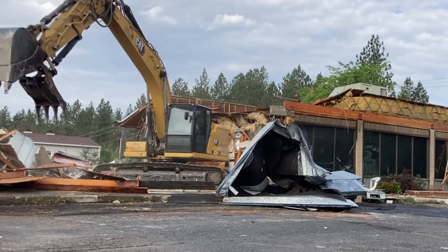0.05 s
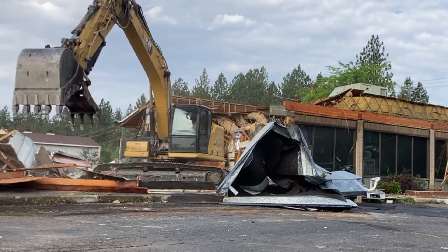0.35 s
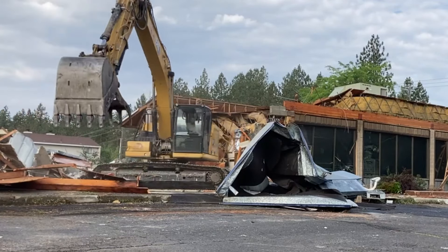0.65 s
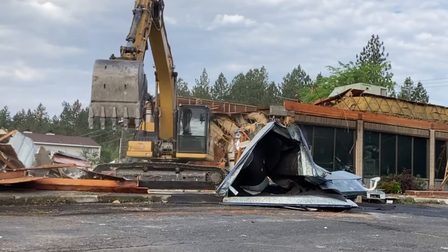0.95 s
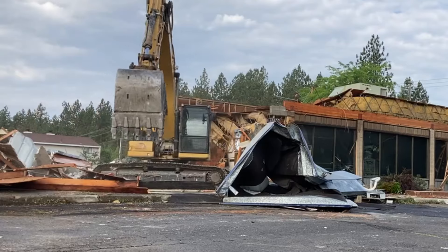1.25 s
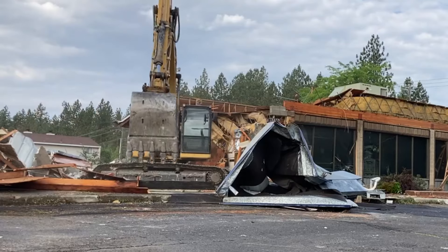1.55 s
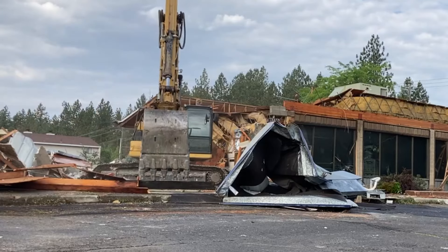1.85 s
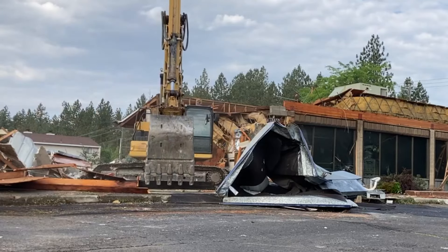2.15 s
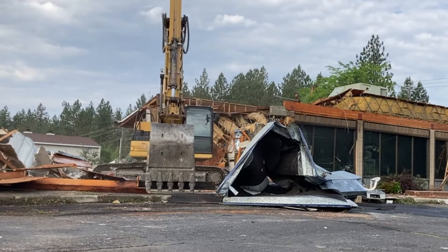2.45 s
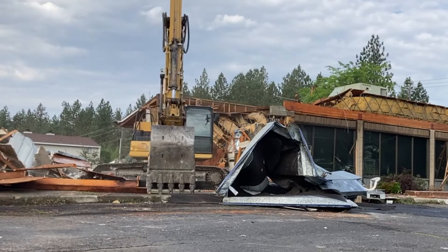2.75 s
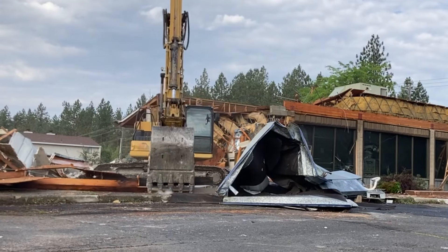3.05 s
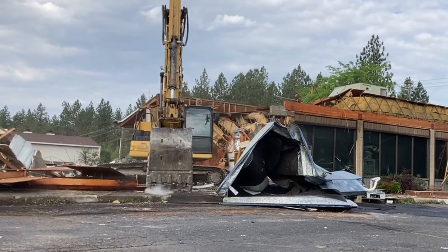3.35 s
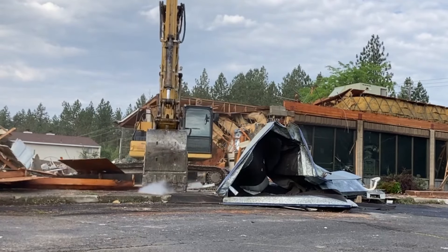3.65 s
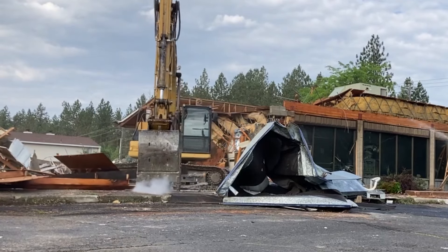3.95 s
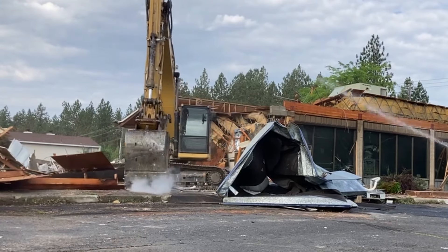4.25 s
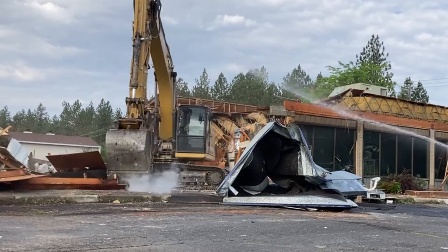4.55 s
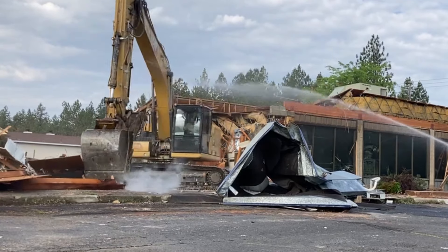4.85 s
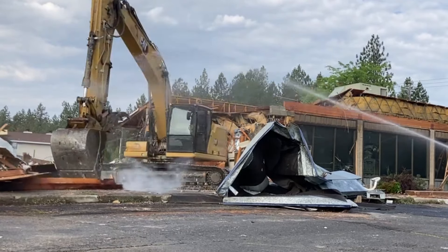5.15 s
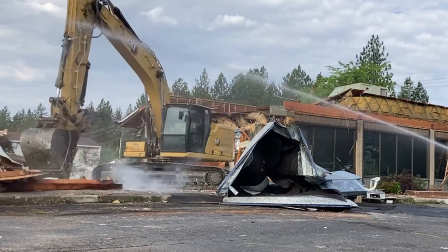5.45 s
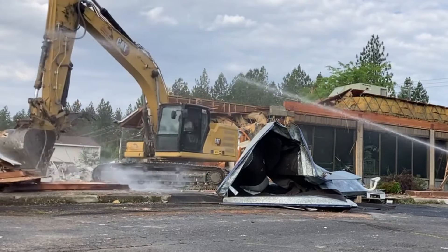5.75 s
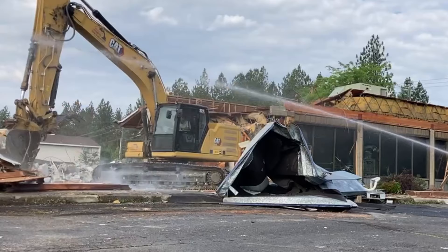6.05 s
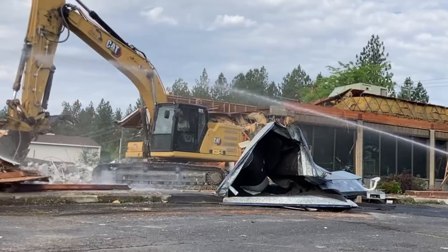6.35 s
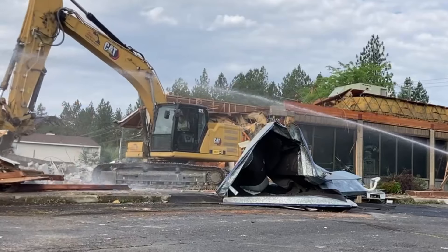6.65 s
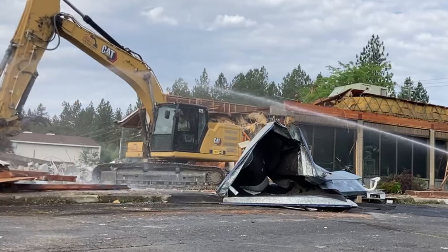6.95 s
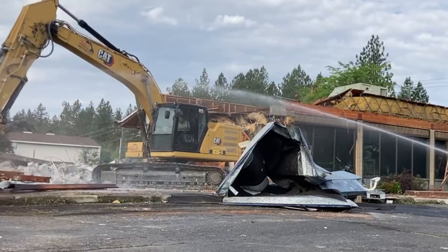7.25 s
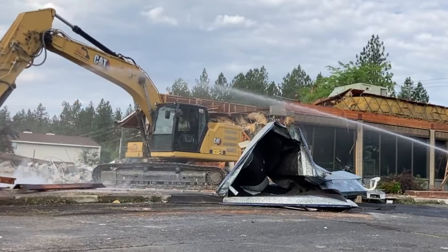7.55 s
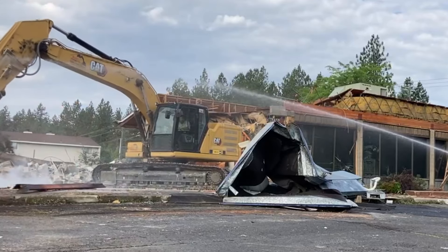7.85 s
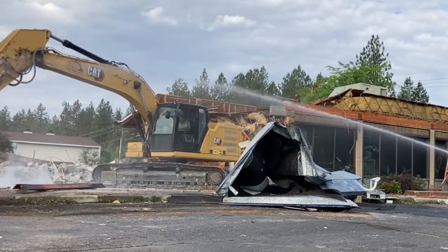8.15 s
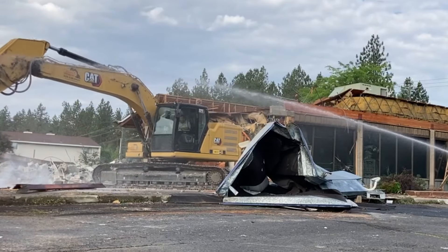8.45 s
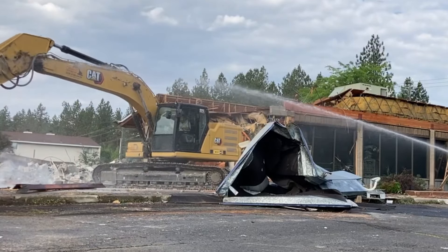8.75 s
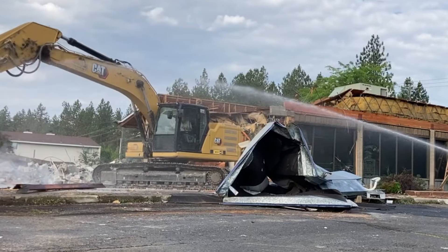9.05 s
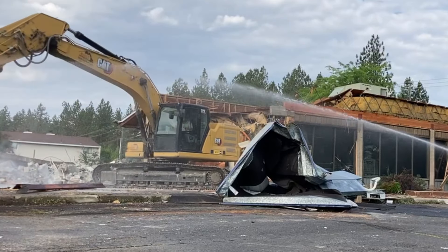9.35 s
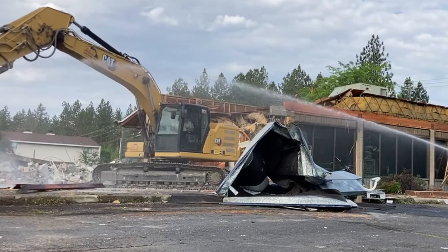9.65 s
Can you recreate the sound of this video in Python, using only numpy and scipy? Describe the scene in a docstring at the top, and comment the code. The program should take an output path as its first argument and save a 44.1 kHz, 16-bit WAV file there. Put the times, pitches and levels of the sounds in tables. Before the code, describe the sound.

Heard from across an open paved lot, an excavator runs with a low diesel hum, a hydraulic whistle and faint linkage rattles. Its steel bucket touches down and scrapes over the pavement, pushing debris toward the left. Hollow metal panels groan and slam, boards crack and steel clanks. The crunching is heaviest in the second half, then dies down over the continuing engine.

```python
"""Excavator shoving wreckage

An excavator swings its bucket over a paved lot, sets it down and shoves a heap to the left. Periodic
combustion drives the diesel's hum, hydraulic motors drone, oil hisses in a valve and the linkage clanks.
Then stick-slip friction grinds steel on asphalt and makes sheet metal squeak, panels rumble in their
modes and timber snaps by brittle fracture. A two-port microphone hears it from across the lot."""
import sys
import numpy as np
from scipy import signal
from scipy.fft import irfft, next_fast_len
from scipy.io import wavfile
from scipy.ndimage import uniform_filter1d, map_coordinates

SR = 44100
rng = np.random.default_rng(int(sys.argv[2]) if len(sys.argv) > 2 else 0)


def log_audio(samples):
    """Write samples as a 16-bit WAV file to the path given in sys.argv[1]."""
    # one column per channel
    frames = np.atleast_2d(samples).T
    # limit to full scale, then quantise
    limited = np.clip(frames, -1, 1)
    pcm = np.round(limited * 32767).astype(np.int16)
    wavfile.write(sys.argv[1], SR, pcm)


N = 437031
T = np.arange(N) / SR
TOUCHDOWN_S = 2.62

# How hard the bucket shoves: time_s, heap_load_db, teeth_pressure_db
SHOVE_FORCE = [(2.68, -26, -29.5), (2.84, -22, -20.5), (2.95, -15, -20.5), (3.33, -15.5, -20.5),
               (3.44, -23, -23), (3.7, -18, -20.5), (3.97, -26, -21.5), (4.35, -23, -22), (5.5, -21.5, -23),
               (5.8, -23.5, -28), (5.96, -13, -19), (6.11, -14, -22), (6.38, -24, -31), (6.55, -20.5, -26),
               (6.78, -9.5, -17), (7.0, -18, -23.5), (7.17, -13, -19.5), (7.38, -14.5, -20),
               (7.7, -17.5, -22), (7.98, -14.5, -23), (8.38, -13, -20), (8.6, -20.5, -26),
               (9.49, -27.5, -30.5), (9.76, -25, -23), (9.9, -28, -31.5)]
# Spectra of the heap's thuds, teeth on asphalt, splintering wood and grit: frequency_hz, density_db
HEAP_SPECTRUM = [(20, -34), (45, -40), (70, -4), (150, -5), (210, 1.5), (300, -2.5), (420, -4.5),
                 (560, -13.5), (1000, -63.5)]
TEETH_SPECTRUM = [(250, -28.5), (450, -2), (620, -5.5), (800, -8.5), (1050, -5), (1550, -10.5), (2000, -18),
                  (3500, -40.5)]
WOOD_SPECTRUM = [(1000, -18), (2300, 3.5), (3100, -5), (3900, -8), (5000, -7.5), (6000, -17.5),
                 (8500, -32.5)]
GRIT_SPECTRUM = [(3500, -92), (6000, 7.5), (7200, 5), (8400, 9), (10000, -0.5), (11500, 6), (13000, -5),
                 (16000, -30)]
# Hollow modes of the bucket and the panels it pushes, before bending: pitch_hz, level_db, t60_s
PANEL_MODES = [(127.4, -2, 0.51), (206.5, 12.5, 0.14), (365.7, 2, 0.23)]
# Strongest panel mode as the panels bend: time_s, pitch_hz
PANEL_BEND = [(3.3, 208), (6.2, 206.8), (6.75, 218.2), (7.4, 218.8), (7.75, 203.7), (7.95, 190.8),
              (8.15, 201.5), (8.45, 214.3)]
# Panels buckling and slamming down: start_s, level_db, t60_s
PANEL_SLAMS = [(2.89, -2.5, 0.19), (2.931, 3, 0.095), (3.075, -7, 0.28), (3.32, -5.5, 0.16),
               (4.085, -11.5, 0.15), (5.36, -7.5, 0.13), (5.559, 0.5, 0.066), (6.135, -3, 0.13),
               (6.72, -11, 0.17), (7.385, -11, 0.097), (7.565, -5, 0.25), (7.755, -5.5, .18),
               (7.865, -7, 0.13), (8.139, -1.5, 0.17), (8.191, -2, 0.12), (8.425, -7.5, 0.24)]
# Pieces crushed under the bucket: start_s, length_s, wood_db, grit_db
CRUSHED_PIECES = [(2.821, 0.1, -29, -29), (2.968, 0.34, -40, -36), (3.476, 0.43, -32, -31),
                  (4.824, 0.44, -32, -36.5), (5.313, 0.089, -30.5, -31.5), (5.466, 0.13, -25.5, -31.5),
                  (6.54, 0.25, -33.5, -37.5), (7.314, 0.079, -27, -30), (7.43, 0.24, -30.5, -37.5),
                  (7.84, 0.15, -34.5, -36), (8.163, 0.18, -30, -28.5), (8.658, 0.7, -32, -40.5),
                  (9.542, 0.09, -36, -58)]
# Blows in the linkage and bucket: start_s, level_db, t60_s
STEEL_KNOCKS = [(.637, -34, 0.13), (1.021, -24, 0.22), (1.229, -31.5, 0.27), (1.296, -30.5, 0.59),
                (1.377, -22, 0.043), (1.638, -33, 0.13), (2.214, -26.5, 0.47), (2.265, -29, 0.062),
                (2.614, -13, 0.28), (2.857, -15.5, 0.35), (2.883, -10.5, 0.09), (3.271, -10, 0.12),
                (3.626, -12.5, 0.32), (3.847, -25, 0.082), (4.063, -17, 0.15), (5.561, -9, 0.12),
                (5.966, -10, 0.18), (6.044, -10.5, 0.49), (6.592, -11, 0.087), (9.716, -16.5, 0.14)]
# Spectrum of a blow: frequency_hz, density_db
KNOCK_SPECTRUM = [(50, -38), (150, 9), (450, 10), (900, 7.5), (1600, 6), (2300, -5.5), (4000, -25),
                  (8000, -27), (16000, -33)]
# Modes of the steel: pitch_hz, level_db, t60_s
STEEL_MODES = [(444, 2, 0.15), (925, -3, 0.38), (1620, -3, 0.15), (1783, -9.5, 0.2), (3070, -5, 0.12),
               (4310, -14.5, .1)]
# Linkage rattles during the swing, then cracks of breaking debris: start_s, level_db, centre_hz, t60_s
BRIGHT_CLICKS = [(1.021, -46, 3500, .05), (1.303, -42, 5600, .11), (2.617, -18.5, 1750, 0.11),
                 (2.618, -26.5, 3300, .07), (2.742, -22, 1550, .07), (2.861, -17, 1690, 0.033),
                 (2.88, -10.5, 1760, 0.051), (2.882, -30, 3960, 0.089), (2.952, -15.5, 1690, 0.038),
                 (3.081, -16, 1690, 0.033), (3.102, -20, 3320, 0.031), (3.273, -23, 7200, 0.025),
                 (3.274, -14, 1990, 0.032), (3.293, -14, 1500, 0.04), (3.296, -24, 4200, 0.022),
                 (3.54, -20, 1680, .04), (3.628, -25, 1200, 0.083), (3.63, -23, 3250, 0.094),
                 (3.823, -15, 1820, 0.022), (4.068, -23, 6700, 0.18), (4.09, -18, 4800, 0.065),
                 (4.336, -15, 1600, .02), (4.779, -28.5, 6500, 0.032), (5.035, -21, 2800, .04),
                 (5.153, -28, 6500, .03), (5.36, -27, 5650, 0.19), (5.56, -21.5, 5600, 0.054),
                 (6.05, -27.5, 5530, 0.15), (6.884, -23, 2480, .03), (7.369, -20, 9500, 0.016),
                 (7.514, -22, 2600, .04), (7.674, -28, 8900, .02), (7.675, -25.5, 2400, 0.19),
                 (7.863, -26, 3100, .06), (7.865, -25, 10500, 0.054), (8.215, -25, 3580, 0.14),
                 (8.391, -21, 2235, 0.059), (8.662, -18.5, 1750, 0.15), (8.932, -21.5, 4350, 0.023),
                 (8.965, -12.5, 3900, 0.018), (9.046, -25, 2260, 0.06)]
# The bucket dragging flat on the asphalt: start_s, length_s, level_db
SHELL_GROANS = [(2.855, 0.59, -22.5), (3.618, 0.073, -17), (4.312, 1.65, -22.5), (5.825, 0.26, -19)]
# Response of the bucket's shell: frequency_hz, density_db
SHELL_SPECTRUM = [(180, -41), (290, 6), (380, 5.5), (560, 4), (680, -1.5), (850, -7), (1500, -69)]
# Boards and sheet edges dragged over the asphalt: start_s, length_s, centre_hz, level_db
EDGE_SCRAPES = [(3.594, 0.13, 3860, -32), (4.952, 0.23, 3870, -38), (5.888, 0.29, 3730, -37),
                (6.69, 0.34, 2450, -36), (7.074, 0.15, 900, -21.5), (7.315, 0.061, 3500, -35.5),
                (7.467, 0.15, 950, -28), (7.477, 0.12, 2560, -31), (8.267, 0.16, 1020, -27),
                (8.496, 1, 1080, -28)]
# Metal sticking and slipping: start_s, length_s, pitch_hz, level_db, jitter_hz
METAL_SQUEAKS = [(.49, 0.21, 720, -46.5, 7), (2.86, 0.047, 4080, -32, 90), (3.844, 0.044, 940, -23, 90),
                 (4.001, 0.14, 635, -23.5, 53), (4.26, 0.36, 998, -27.5, 47), (7.324, 0.03, 3074, -32, 60),
                 (7.346, 0.037, 3270, -30, 65), (8.136, 0.02, 4690, -26, 15),
                 (8.192, 0.02, 4660, -24, 14.8), (8.221, 0.052, 4680, -30, 15)]
# Diesel harmonics of half the firing rate: multiple, level_db
ENGINE_ORDERS = [(2, -39.5), (3, -42.5), (4, -40.5), (5, -54), (6, -60), (7, -53)]
# Spectrum of the diesel's clatter: frequency_hz, density_db
CLATTER_SPECTRUM = [(20, -49), (42, -4.5), (70, -0.5), (105, -6), (210, -1), (280, -6.5), (400, -9.5),
                    (650, -14.5), (820, -13), (1100, -17), (1600, -22), (2200, -26), (3000, -28),
                    (4300, -36.5), (8000, -41), (16000, -101)]
# Hydraulic motors at work: start_s, length_s, pitch_hz, level_db, glide_hz_per_s
MOTOR_RUNS = [(-0.59, 1, 246.5, -31, -2.5), (-.1, 0.47, 84.5, -32.5, 2), (0.36, 0.99, 69, -35, 7),
              (0.76, 0.65, 150, -44, -3), (.55, 1.85, 110, -46, 0), (0.24, 1.5, 495, -53, -0.5),
              (1.5, 3, 280, -50, -0.5), (1.25, 1.39, 80, -47, -6.5)]
# Oil passing through a valve: time_s, whistle_hz, whistle_db, rush_db
VALVE_FLOW = [(.5, 11300, -80, -61), (1.06, 11160, -68, -57), (1.13, 10700, -43.5, -54),
              (1.22, 10500, -55, -50), (1.4, 11400, -61, -51), (1.75, 12350, -55, -52),
              (1.9, 12550, -56, -55), (2.03, 12200, -50, -54), (2.15, 11200, -51, -54),
              (2.28, 10400, -59, -58), (2.5, 10400, -78, -64)]
# Spectrum of the rushing oil: frequency_hz, density_db
RUSH_SPECTRUM = [(3000, -23), (5500, -18), (6800, 10), (9500, 1.5), (11500, 12), (12600, 3),
                 (14500, -10)]
# Lead of the microphone's left port over the right: time_s, lead_samples
LEFT_LEAD = [(0, 5), (3.2, 4.5), (5.2, 8), (7, 10), (9.9, 11.5)]
# Left port relative to the right: frequency_hz, level_db
LEFT_TILT = [(400, -.5), (650, 0), (1000, 7), (1600, 4.5), (2100, 2), (2800, 5.5), (4000, 1.5),
             (7000, -0.5)]
# Weight of the diffuse sound relative to the direct: frequency_hz, level_db
DIFFUSE_SHARE = [(100, -17.5), (250, -25.5), (600, -4), (2500, -9), (4500, -3.5), (7000, -8), (16000, -85)]


def shove(hollow=0.75, boom_from_db=-16, steel=0.12, moan_db=-9, twig_db=-8):
    """Stick-slip friction: the bucket's slips shake the heap and break asphalt, wood and grit."""
    load_db, teeth_db = follow(SHOVE_FORCE)
    heap_db = 20 * np.log10(np.hypot(amp(load_db), slams()))
    wood_gain, grit_gain = crushing(teeth_db)
    stick_slip = wander(12.6)
    sway, judder = amp(0.5 * stick_slip), amp(1.08 * stick_slip)  # the heavy heap evens out the jerks
    clumps = amp(1.5 * wander(27))  # brittle things break in bunches
    thuds = unit(colour(grains(per_s=1500, spread_db=1.5), HEAP_SPECTRUM))
    boom = unit(flex(ring(grains(per_s=900, spread_db=3), PANEL_MODES)))
    ringing = hollow * amp(heap_db - boom_from_db)  # hard pushes set the panels booming
    heap = (thuds + ringing * boom) / np.sqrt(1 + ringing ** 2) * sway
    bites = grains(per_s=3200, spread_db=0.5) * judder
    teeth = unit(colour(bites, TEETH_SPECTRUM)) + steel * unit(ring(bites, STEEL_MODES))
    fibres = grains(per_s=6000, spread_db=-0.5) * judder * clumps
    timber = unit(colour(fibres, WOOD_SPECTRUM)) + amp(twig_db) * twigs()
    grit = colour(grains(per_s=5000, spread_db=3.2) * judder * clumps, GRIT_SPECTRUM)
    layers = [(heap, amp(heap_db)), (teeth, amp(teeth_db)), (boards(), amp(load_db + moan_db)),
              (timber, wood_gain), (grit, grit_gain)]
    contact = np.clip((T - TOUCHDOWN_S) / 0.011, 0, 1) * sticking()
    return contact * sum(gain * unit(layer) for layer, gain in layers)


def slams(rise_s=0.0075):
    """Buckling: each panel that gives way loads the heap with a quickly rising, dying force."""
    return pulses(PANEL_SLAMS, rise_s)


def crushing(pressure_db, wood_db=-11.5, growth_db_per_s=0.05, grit_db=-16):
    """Brittle crushing: the gains of wood and grit follow pressure and swell for each piece crushed."""
    wood, grit = np.zeros(N), np.zeros(N)
    for start_s, length_s, piece_wood_db, piece_grit_db in CRUSHED_PIECES:
        swell = signal.windows.tukey(int(length_s * SR), 0.33)
        add(wood, start_s, amp(piece_wood_db) * swell)
        add(grit, start_s, amp(piece_grit_db) * swell)
    caught_db = wood_db + growth_db_per_s * (T - TOUCHDOWN_S)  # a growing heap catches more timber
    return np.hypot(wood, amp(pressure_db + caught_db)), np.hypot(grit, amp(pressure_db + grit_db))


def flex(x):
    """Frequency modulation: bending raises and lowers all the panel modes in the same ratio."""
    pitch_hz, = follow(PANEL_BEND)
    rest_hz = PANEL_MODES[1][0]
    return map_coordinates(x, [np.cumsum(pitch_hz / rest_hz)], order=1, mode="mirror")


def sticking(depth_db=3, hold_s=0.026):
    """Static friction: the bucket catches and falls quieter just before each knock lets it go."""
    stuck = np.zeros(N)
    catch = np.clip(np.linspace(0, 2, int(2 * hold_s * SR)), 0, 1)
    for start_s, *_ in STEEL_KNOCKS:
        add(stuck, start_s - 2 * hold_s, catch)
    return amp(-depth_db * uniform_filter1d(stuck, size=128))


def boards(low_hz=290, high_hz=590, t60_s=0.26, rise_s=0.012, glide=0.062, range_db=6, count=130):
    """Damped vibration: boards and sheets catch in turn, each with a short moan that bends in pitch."""
    out, t = np.zeros(N), np.arange(SR // 3) / SR
    envelope = (1 - np.exp(-t / rise_s)) * decay(t, t60_s)
    for k, (when, pitch, size, bend) in enumerate(rng.random((count, 4))):
        onset_hz = low_hz * (high_hz / low_hz) ** pitch
        hz = onset_hz * (1 + glide * (2 * bend - 1) * t / t60_s)
        add(out, (k + when) / count * N / SR, amp(range_db * size) * envelope * np.sin(phase_of(hz)))
    return unit(out)


def twigs(low_hz=1600, high_hz=4800, t60_s=0.061, range_db=8, count=800):
    """Random fracture: small laths snap independently, each at its own pitch."""
    out = np.zeros(N)
    for when, pitch, size in rng.random((count, 3)):
        centre_hz = low_hz * (high_hz / low_hz) ** pitch
        add(out, when * N / SR, amp(range_db * size) * click(centre_hz, t60_s, width=0.57))
    return unit(out)


def knocks(steel=0.19, rise_s=0.004):
    """Impact excitation: each blow is a short rattle of contacts that rings the steel's modes."""
    contacts = pulses(STEEL_KNOCKS, rise_s) * grains(per_s=5000, spread_db=0.5)
    return colour(contacts, KNOCK_SPECTRUM) + steel * ring(contacts, STEEL_MODES)


def clicks():
    """Short bright transients: the linkage rattles while the bucket swings, then debris cracks."""
    out = np.zeros(N)
    for start_s, level_db, centre_hz, t60_s in BRIGHT_CLICKS:
        add(out, start_s, amp(level_db) * click(centre_hz, t60_s))
    return out


def click(centre_hz, t60_s, width=0.65, spread_db=3, spike=5):
    """Impulsive excitation: a first spike and a dying burst of noise ring one broad resonance."""
    t = np.arange(SR // 5) / SR
    burst = rng.standard_normal(len(t)) * amp(spread_db * rng.exponential(1, len(t)).clip(0, 4))
    burst[0] = spike
    envelope = decay(t, t60_s)
    piece = resonance(burst * envelope, centre_hz, width)
    return piece * np.linalg.norm(envelope) / np.linalg.norm(piece)


def groans(judder_db=4):
    """Forced vibration: slips of the dragging bucket excite its hollow shell."""
    envelope = np.zeros(N)
    for start_s, length_s, level_db in SHELL_GROANS:
        add(envelope, start_s, amp(level_db) * signal.windows.tukey(int(length_s * SR), 0.34))
    slips = grains(per_s=640, spread_db=0) * amp(judder_db * wander(19))
    return envelope * unit(colour(slips, SHELL_SPECTRUM))


def scrapes(chatter_db=1.5):
    """Friction noise: bunches of tiny slips at a dragged edge ring one resonance of the piece."""
    out = np.zeros(N)
    slips = grains(per_s=2500, spread_db=1.5) * amp(chatter_db * wander(55))
    for start_s, length_s, centre_hz, level_db in EDGE_SCRAPES:
        stroke = slips[int(start_s * SR):][:int(length_s * SR)]
        rub = unit(resonance(stroke, centre_hz, width=0.68))
        add(out, start_s, amp(level_db) * rub * signal.windows.tukey(len(rub), 0.89))
    return out


def squeaks(roughness=0.54, flutter_hz=150):
    """Stick-slip oscillation: rubbed metal gives short tones, unsteady in pitch and strength."""
    out, drift, shake = np.zeros(N), wander(flutter_hz), wander(flutter_hz)
    for start_s, length_s, pitch_hz, level_db, jitter_hz in METAL_SQUEAKS:
        n, at = int(length_s * SR), int(start_s * SR)
        tone = np.sqrt(2) * np.sin(phase_of(pitch_hz + jitter_hz * drift[at:at + n]))
        envelope = (1 + roughness * shake[at:at + n]) * signal.windows.tukey(n, 0.5)
        add(out, start_s, amp(level_db) * tone * envelope)
    return out


def engine(half_firing_hz=41.72, clatter_db=-37, throb=0.096, waver=0.0047):
    """Periodic combustion: the diesel's harmonics sound over a clatter that throbs with each firing."""
    phase = phase_of(half_firing_hz * (1 + waver * wander(2.73)))
    hum = np.zeros(N)
    for multiple, level_db in ENGINE_ORDERS:
        strength = amp(level_db) * (1 + 0.2 * wander(5))
        hum += strength * np.sin(multiple * phase + rng.uniform(0, 2 * np.pi))
    clatter = colour(rng.standard_normal(N) * (1 + throb * np.cos(2 * phase)), CLATTER_SPECTRUM)
    return hum + amp(clatter_db) * unit(clatter)


def motors(wobble_hz=1.04, roughness=0.32):
    """Rotational tones: each hydraulic motor swells, hums at a pitch that drifts with speed, and stops."""
    out = np.zeros(N)
    for start_s, length_s, pitch_hz, level_db, glide_hz_per_s in MOTOR_RUNS:
        n = int(length_s * SR)
        hz = pitch_hz + glide_hz_per_s * (T[:n] - length_s / 2) + wobble_hz * wander(6)[:n]
        envelope = (1 + roughness * wander(6)[:n]) * signal.windows.tukey(n, 0.51)
        add(out, start_s, amp(level_db) * np.sqrt(2) * np.sin(phase_of(hz)) * envelope)
    return out


def valve(width_hz=450, seat_hz=10970, seat_db=-10, sputter_db=0.7):
    """Flow noise: a whistle glides as the valve opens and shuts, over rushing oil and the seat's tone."""
    whistle_hz, whistle_db, rush_db = follow(VALVE_FLOW)
    whistle = unit(hiss(phase_of(whistle_hz), width_hz))
    seat = amp(seat_db) * hiss(2 * np.pi * seat_hz * T, width_hz / 6)
    rush = unit(colour(rng.standard_normal(N), RUSH_SPECTRUM))
    sputter = amp(sputter_db * wander(40))
    return amp(whistle_db) * whistle + amp(rush_db) * unit((rush + seat) * sputter)


def echoes(x, t60_s, delay_s, count=4, per_s=3000):
    """Scattering: pavement, machine and walls return echoes whose paths mix in changing shares."""
    out, t = np.zeros(N), np.arange(SR // 3) / SR
    paths = np.array([wander(16.5) for _ in range(count)])
    for share in paths / np.linalg.norm(paths, axis=0):
        arrivals = rng.choice([-1, 1], len(t)) * (rng.random(len(t)) < per_s / SR)
        out += convolve(x * share, arrivals * (t > delay_s) * decay(t, t60_s))
    return out


def ports(direct, diffuse, treble_lead_samples=-10, cross_hz=6600, detour_rad=0.68, detour_hz=1700):
    """Path difference: the left port leads as the work moves left; in the treble the offset reverses."""
    hz, t, (direct, diffuse) = signal.stft(np.array([direct, diffuse]), SR, nperseg=1024, noverlap=768)
    hz = hz[:, None]
    lead = np.interp(t, *np.transpose(LEFT_LEAD))
    phase = 2 * np.pi * np.where(hz < cross_hz, hz * lead, (hz - cross_hz) * treble_lead_samples) / SR
    # Middle tones diffract round the casing.
    phase += detour_rad * np.exp(-2 * np.log((hz + 1) / detour_hz) ** 2)
    share, tilt = gain_at(DIFFUSE_SHARE, hz), gain_at(LEFT_TILT, hz)
    left = (direct + share * diffuse) * tilt
    right = (direct - share * diffuse) * np.exp(-1j * phase)
    pair = np.array([left, right]) / np.sqrt((1 + share ** 2) * (1 + tilt ** 2) / 2)
    return signal.istft(pair, SR, nperseg=1024, noverlap=768)[1][:, :N]


def amp(db):
    """Amplitude ratio of a level in decibels."""
    return 10 ** (np.asarray(db) / 20)


def unit(x):
    """Normalisation to rms 1."""
    return x / np.sqrt(np.mean(x ** 2) + 1e-20)


def decay(t, t60_s):
    """Exponential damping: 60 dB down after t60_s."""
    return np.exp(-np.log(1000) * t / t60_s)


def phase_of(hz):
    """Phase as the integral of frequency."""
    return 2 * np.pi * np.cumsum(hz) / SR


def gain_at(spectrum, hz):
    """Interpolation of a decibel spectrum on a log-frequency axis, returned as gain."""
    points_hz, level_db = np.transpose(spectrum)
    return amp(np.interp(np.log(hz + 1), np.log(points_hz + 1), level_db))


def follow(rows):
    """Linear interpolation of each column of a time curve at every sample."""
    time_s, *columns = np.transpose(rows)
    return [np.interp(T, time_s, column) for column in columns]


def add(mix, start_s, sound):
    """Superposition of a sound on the mix."""
    start = round(start_s * SR)
    sound, part = sound[max(-start, 0):], mix[max(start, 0):]
    part[:len(sound)] += sound[:len(part)]


def pulses(events, rise_s):
    """Transient forces, each with an exponential rise and decay."""
    force, t = np.zeros(N), np.arange(SR // 2) / SR
    for start_s, level_db, t60_s in events:
        add(force, start_s, amp(level_db) * (1 - np.exp(-t / rise_s)) * decay(t, t60_s))
    return force


def wander(rate_hz):
    """Low-pass noise of rms 1, with up to about rate_hz changes a second."""
    size = next_fast_len(N, True)
    bins = np.arange(min(int(3 * rate_hz * size / SR), size // 2))
    draw = np.random.default_rng(rng.integers(2 ** 32)).standard_normal((len(bins), 2))
    rolloff = np.exp(-(bins * SR / size / rate_hz) ** 2)
    return unit(irfft((draw[:, 0] + 1j * draw[:, 1]) * rolloff, size)[:N])


def hiss(phase, width_hz):
    """Quadrature modulation: a narrow band of noise around a carrier."""
    return wander(width_hz) * np.cos(phase) + wander(width_hz) * np.sin(phase)


def grains(per_s, spread_db):
    """Shot noise: tiny impacts at random times, their levels spread exponentially."""
    size = amp(spread_db * np.minimum(rng.exponential(1, N), 4.5))
    return unit(size * rng.choice([-1, 1], N) * (rng.random(N) < per_s / SR))


def convolve(x, response):
    """Convolution with an impulse response scaled to unit energy."""
    return signal.oaconvolve(x, response / np.linalg.norm(response))[:N]


def colour(x, spectrum):
    """Minimum-phase filtering, which lets clicks keep their sharp fronts."""
    log_gain = np.log(gain_at(spectrum, abs(np.fft.fftfreq(8192, 1 / SR))))
    response = np.fft.ifft(np.exp(np.conj(signal.hilbert(log_gain))))
    return convolve(x, response.real[:4096])


def ring(x, modes):
    """Modal response: a body answers as a sum of damped sinusoids."""
    t = np.arange(SR // 2) / SR
    body = sum(amp(db) * decay(t, t60_s) * np.sin(2 * np.pi * hz * t) for hz, db, t60_s in modes)
    return convolve(x, body)


def resonance(x, centre_hz, width):
    """Broad resonance: two passes through a resonator of Q = 1 / width."""
    b, a = signal.iirpeak(centre_hz, 1 / width, fs=SR)
    return signal.lfilter(b, a, signal.lfilter(b, a, x))


def scene(shove_db=-1.18, echo_db=-13):
    """Superposition: the machine, its work and their echoes meet at the microphone."""
    machine = engine() + valve() + motors()
    work = amp(shove_db) * shove() + groans() + knocks() + clicks() + scrapes() + squeaks()
    direct = machine + work
    far_echoes = amp(echo_db) * echoes(work, t60_s=0.73, delay_s=0.022)
    diffuse = echoes(direct, t60_s=0.091, delay_s=0.001)
    return ports(direct + far_echoes, diffuse)


def record(dry, low_cut_hz=46, ceiling=0.95, high_cut_hz=15850):
    """Band limiting and saturation: the microphone sheds deep bass, rounds peaks and cuts the top."""
    thin = signal.sosfilt(signal.butter(3, low_cut_hz, "high", fs=SR, output="sos"), dry)
    rounded = thin / (1 + abs(thin / ceiling) ** 8) ** (1 / 8)
    low_pass = signal.firwin(511, high_cut_hz, window=("kaiser", 9), fs=SR)
    return signal.oaconvolve(rounded, low_pass[None], "same")


dry = scene()
out = record(dry)
log_audio(out)
```